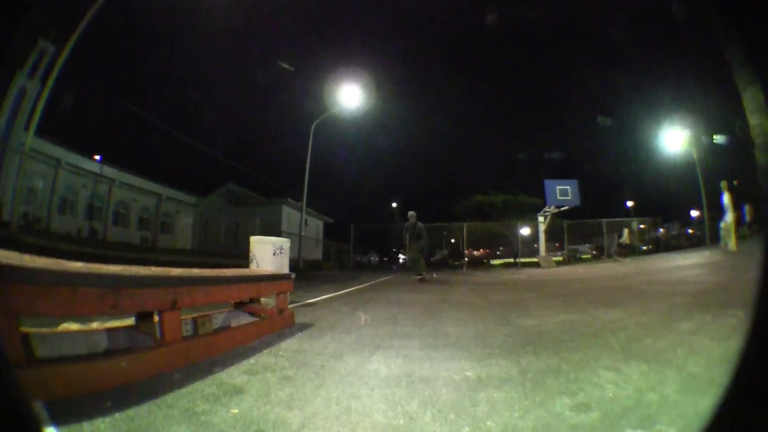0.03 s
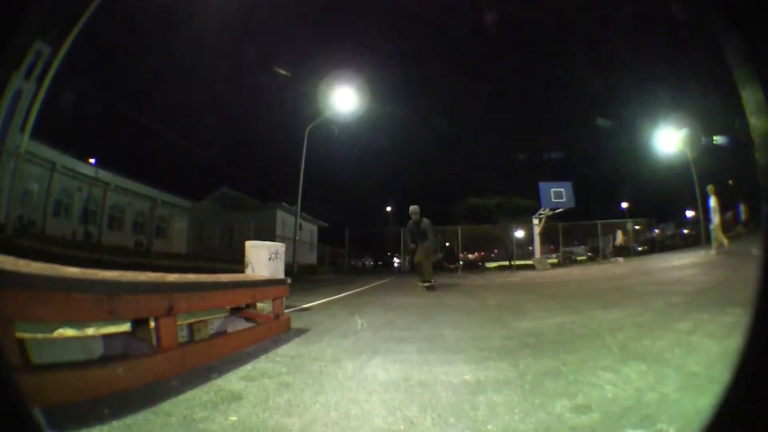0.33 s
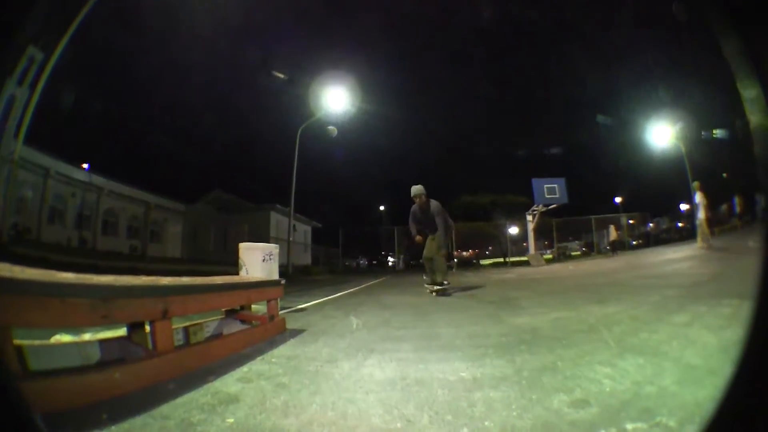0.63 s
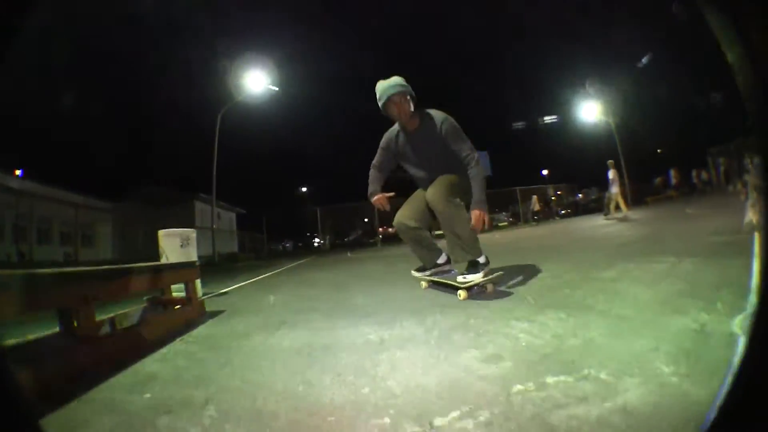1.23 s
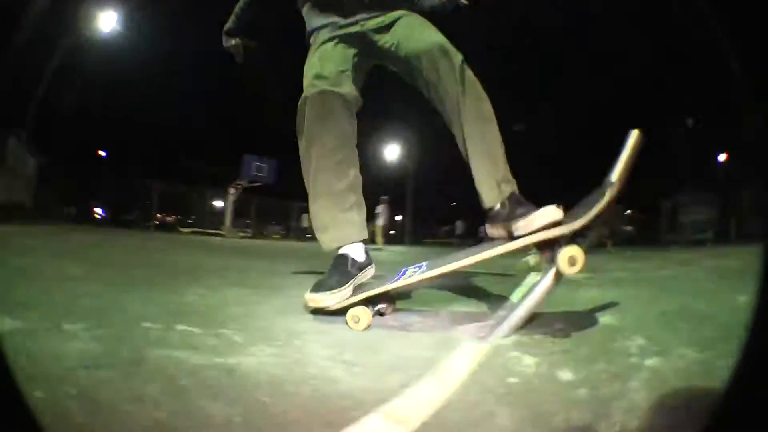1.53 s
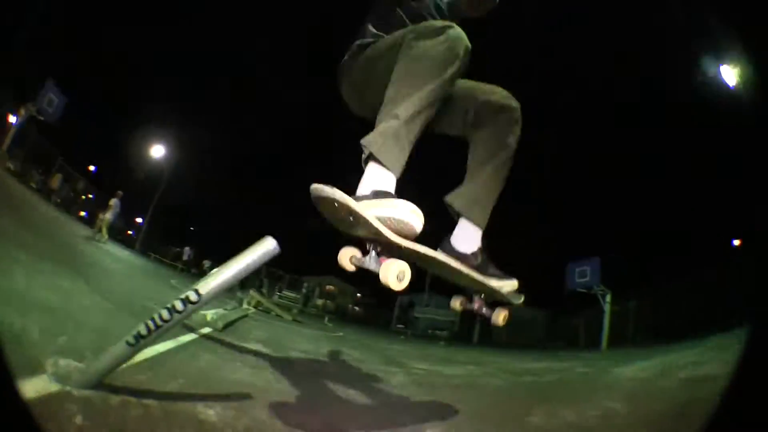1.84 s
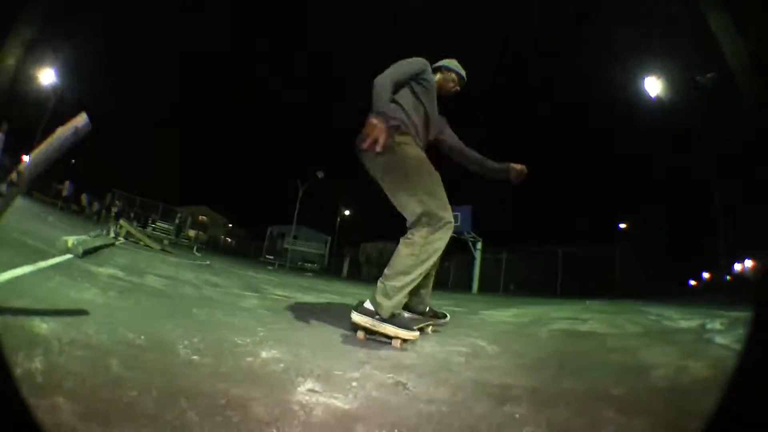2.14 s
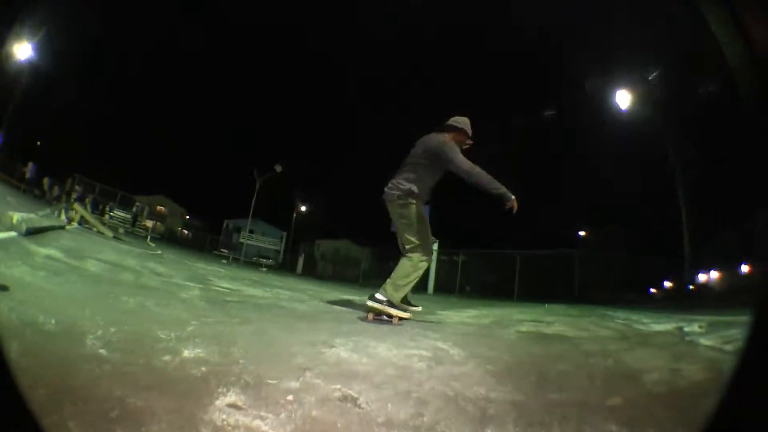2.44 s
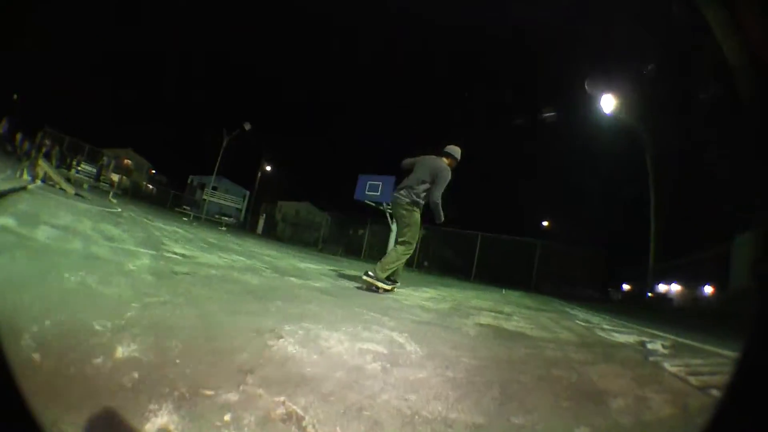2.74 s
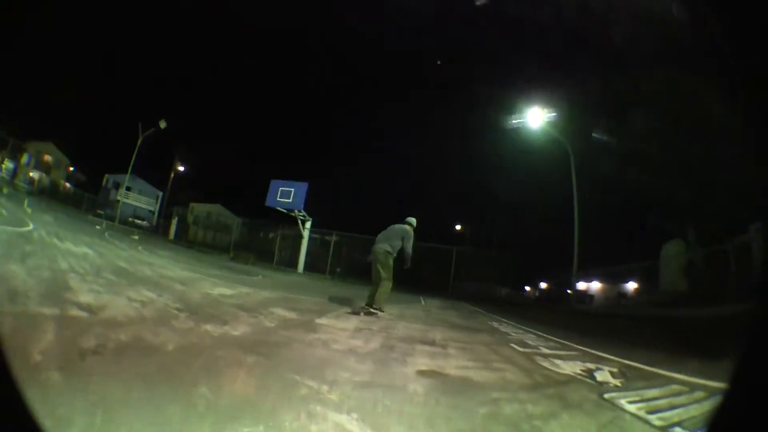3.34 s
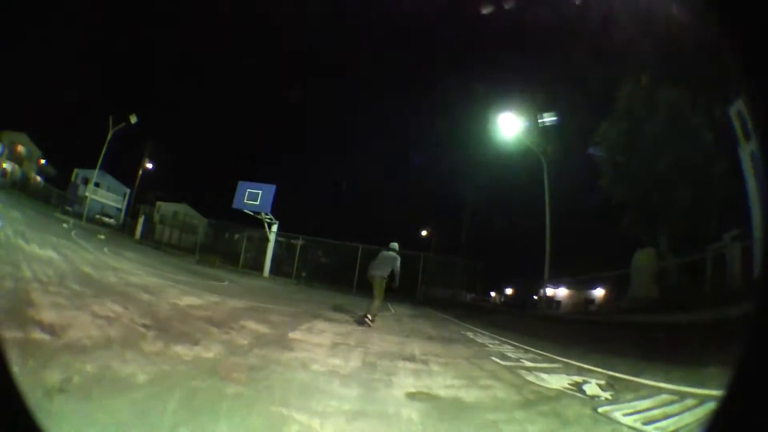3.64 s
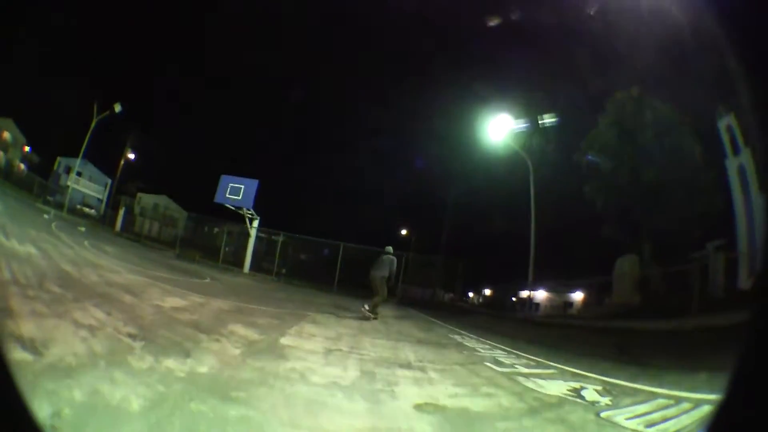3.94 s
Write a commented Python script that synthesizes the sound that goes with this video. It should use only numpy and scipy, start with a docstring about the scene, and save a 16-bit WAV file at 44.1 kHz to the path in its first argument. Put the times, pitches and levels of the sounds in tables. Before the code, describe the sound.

A skateboard rolls over a rough outdoor court with a gritty roar and small crunches of stones. At about 1.6 seconds it scrapes and clanks up a steel pole, then the rolling stops and a high metallic ring swells with a faint echo. It slams down at 2.1 seconds and rolls away more quietly until 4 seconds, the wheels knocking over cracks and giving short sideways skids.

```python
"""Skateboard pole jam

A skateboard rolls up over a rough outdoor court, grit drumming on the deck and stones crunching.
It jams up a slanted steel pole and pops off, one truck ringing and the court echoing as it flies.
It lands hard, then clatters away, its wheels knocking over cracks and slipping sideways."""
import sys
import numpy as np
from scipy import signal
from scipy.fft import rfft, irfft
from scipy.io import wavfile

SR = 44100
rng = np.random.default_rng(int(sys.argv[2]) if len(sys.argv) > 2 else 0)


def inscribe(sig):
    """Save sig as 16-bit PCM at rate SR to the path in sys.argv[1].

    A 1-D sig is mono; a 2-D sig holds one channel per row.
    Samples are clipped to [-1, 1] before scaling.
    """
    pcm = np.round(np.clip(np.atleast_2d(sig).T, -1, 1) * 32767)
    wavfile.write(sys.argv[1], SR, pcm.astype(np.int16))


N = 176400
T = np.arange(N) / SR
BIN_HZ = np.arange(N // 2 + 1) * SR / N


def from_db(db):
    """Decibels to gain."""
    return 10 ** (np.asarray(db) / 20)


def unit_rms(x):
    """Scale so that the middle of the stereo pair has rms 1."""
    return x / np.sqrt(np.mean(x.mean(0) ** 2) + 1e-20)


def pan(db):
    """Channel gains for a left-minus-right level."""
    return from_db(db * np.array([[0.5], [-0.5]]))


def gate(start_s, end_s):
    """On between two times: 1 ms fade in, 5 ms fade out."""
    return np.clip((T - start_s) * 1000, 0, 1) * np.clip((end_s - T) * 200, 0, 1)


def faders(rows):
    """One gain curve for each level column of (time_s, level_db, ...)."""
    times, *columns = np.transpose(rows)
    return [from_db(np.interp(T, times, column)) for column in columns]


def envelope(rows):
    """One gain curve, silent outside its rows."""
    return faders(rows)[0] * gate(rows[0][0], rows[-1][0])


def over_bins(points):
    """A (freq_hz, value) curve read at every FFT bin."""
    hz, value = np.transpose(points)
    return np.interp(np.log(BIN_HZ + 1), np.log(hz), value)


def body(x, colour):
    """A resonant body: a causal, minimum-phase filter with the given colour."""
    cepstrum = irfft(np.log(from_db(over_bins(colour))), N)
    cepstrum[1:N // 2] *= 2
    cepstrum[N // 2 + 1:] = 0
    return irfft(rfft(x) * np.exp(rfft(cepstrum)), N)


def drift(rate_hz):
    """A smooth random wobble with standard deviation 1."""
    wobble = irfft(rfft(rng.standard_normal(N)) / (1 + (BIN_HZ / rate_hz) ** 2), N)
    return wobble / wobble.std()


# How alike left and right are: freq_hz, likeness (clipped to +-0.99)
STEREO_LIKENESS = [(100,-0.4),(250,1.6),(500,0.66),(1000,0.83),(2000,0.66),(4000,0.75),(8000,0.43),(14000,0.25)]

def widen(mid, side):
    """Stereo from two unrelated signals: narrow in the mids, wide in the bass and treble."""
    alike = np.clip(over_bins(STEREO_LIKENESS), -0.99, 0.99)
    return irfft(np.sqrt(1 + alike) * rfft(mid) + np.sqrt(1 - alike) * rfft(side) * [[1], [-1]], N)


def grit(per_s, spread_db, hiss_db, rough_db, rough_hz):
    """Tiny uneven impacts over a smooth hiss, pressed harder and softer by bumps."""
    sizes = from_db(spread_db * np.minimum(rng.exponential(1, N), 4))
    impacts = sizes * (rng.random(N) < per_s / SR)
    clicks = impacts / impacts.std() * rng.choice([-1, 1], (2, N))
    bumps = from_db(rough_db * drift(rough_hz))
    hiss = from_db(hiss_db) * rng.standard_normal((2, N))
    return widen(*((clicks + hiss) * bumps))


def blows(rows, colour, side_db):
    """Each blow (start_s, level_db, t60_s) is a dense crack that dies fast in the struck body."""
    force = sum(from_db(db - 60 * np.maximum(T - s, 0) / t60) * (T >= s) for s, db, t60 in rows)
    mid, side = rng.choice([-1, 1], (2, N)) * force
    cracks = mid + from_db(side_db) * side * np.array([[1], [-1]])
    colour_rms = np.sqrt(np.mean(from_db(over_bins(colour)) ** 2))
    return body(cracks, colour) / colour_rms


def deck_ring(x, t60_s=0.14, damped_above_hz=2500):
    """The plywood's many close modes ring on briefly after every impact."""
    ring = rng.standard_normal(N) * from_db(-60 * np.minimum(T / t60_s, 4))
    ring *= from_db(-11) / np.sqrt(np.sum(ring ** 2))
    ring = signal.sosfilt(signal.butter(1, damped_above_hz, fs=SR, output="sos"), ring)
    return x + irfft(rfft(x) * rfft(ring), N)


# Where the roll sits in the image: freq_hz, left_minus_right_db
ROLL_PAN = [(60, -7), (150, 5.5), (380, 6.5), (950, 1.5), (2380, 0.5), (5980, -0.5), (15000, 0)]

def rolling(deck, rows, crossovers_hz):
    """The ringing deck, split into bands that each ride their own fader."""
    spectrum = rfft(deck_ring(deck)) * pan(over_bins(ROLL_PAN))
    lowpasses = [0] + [1 / (1 + (BIN_HZ / hz) ** 10) for hz in crossovers_hz] + [1]
    bands = [irfft(spectrum * (upper - lower), N) for lower, upper in zip(lowpasses, lowpasses[1:])]
    return sum(gain * unit_rms(band) for gain, band in zip(faders(rows), bands))


# The deck's tone far off, then close by: freq_hz, level_db
DECK_FAR_COLOUR = [(35,-56),(100,-44),(140,-23),(200,-23),(400,-10),(515,4.5),(640,-8.5),(760,-4.5),(890,-3.5),(1050,-6.5),(1320,-9),(1520,-9.5),(1950,-17),(2650,-13.5),(3900,-15.5),(5700,-22.5),(6400,-19),(7100,-27),(13000,-36.5),(15000,-66)]
DECK_CLOSE_COLOUR = [(35, -61), (87, -39), (151, -25), (324, -17), (418, -1), (605, -1), (916, -8.5),
                     (1010, -1.5), (1300, -14), (1490, -12), (1750, -18), (3340, -17.5), (6230, -22),
                     (7000, -26.5), (13500, -39.5), (15000, -82)]
# The swell of the approach: time_s, roar_db, treble_db
RUN_UP_LEVELS = [(0.09, -18, -31.5), (0.16, -15.5, -27.5), (0.228, -20.5, -31), (0.268, -16.5, -27),
                 (0.566, -17, -28), (0.584, -21, -32), (0.614, -15, -27), (0.854, -16, -25.5),
                 (0.867, -11.5, -21), (0.954, -17.5, -28), (1.15, -16.5, -26.5), (1.266, -14, -24),
                 (1.562, -13, -21.5), (1.642, -18.5, -32), (1.66, -19, -28)]
RUN_UP_S = (0.085, 1.674)

def run_up():
    """Grit under the wheels drums on the deck, whose tone shifts as it comes close."""
    contact = grit(per_s=2500, spread_db=2, hiss_db=-0.5, rough_db=1.5, rough_hz=52)
    far = unit_rms(body(contact, DECK_FAR_COLOUR))
    close = unit_rms(body(contact, DECK_CLOSE_COLOUR))
    nearness = np.interp(T, [0.89, 1.14], [0, 1])
    deck = (1 - nearness) * far + nearness * close
    return rolling(deck, RUN_UP_LEVELS, crossovers_hz=[2000]) * gate(*RUN_UP_S)


# Stones caught under a wheel: start_s, level_db
STONE_BURSTS = [(0.709,-21),(0.884,-15.5),(1.372,-20),(1.486,-14.5),(1.524,-15),(1.59,-13.5),(2.601,-19),(2.714,-22),(2.779,-19.5),(2.93,-23.5)]
# Their brittle tone: freq_hz, level_db
STONE_COLOUR = [(100,-50),(1200,2.5),(3800,3.5),(8000,-4.5),(14000,-39)]

def crunches(stone_t60_s=0.058, ticks_per_s=45, tick_t60_s=0.014):
    """Small stones burst under the wheels; stray grains tick along with the run-up's treble."""
    stones = blows([(s, db, stone_t60_s) for s, db in STONE_BURSTS], STONE_COLOUR, side_db=-7)
    pinches = (rng.random(N) < ticks_per_s / SR) * rng.uniform(0.36, 1, N)
    force = signal.lfilter([1], [1, -from_db(-60 / (tick_t60_s * SR))], pinches + 1e-18)
    grains = widen(*(force * rng.choice([-1, 1], (2, N))))
    ticks = unit_rms(body(grains, STONE_COLOUR))
    _, treble = faders(RUN_UP_LEVELS)
    return stones + from_db(-7) * ticks * treble * gate(*RUN_UP_S)


# The steel pole's modes: pitch_hz, level_db, t60_s
STEEL_MODES = [(1400,-19,0.15),(2728,-19.5,0.6),(3040,-18,0.062),(3530,-13.5,0.17),(3980,-16,.1),(4280,-5.5,0.056),(4620,-3,0.028),(5200,-6,0.052),(6050,-9.5,0.038),(7940,-25,0.09),(8250,-21,.07)]

def pole_ring(force):
    """Each mode of the pole is a damped resonator, driven a little unevenly by the force."""
    rings = 0
    for hz, db, t60 in STEEL_MODES:
        decay, step = from_db(-60 / (t60 * SR)), 2 * np.pi * hz / SR
        drive = force * from_db(db + 2 * drift(31)) + 1e-18
        rings += signal.lfilter([0, np.sin(step)], [1, -2 * decay * np.cos(step), decay ** 2], drive)
    return rings


# The scrape up the pole: time_s, level_db
GRIND_LEVELS = [(1.575,-32),(1.61,-13),(1.642,-15.5),(1.663,-26),(1.695,-20.5),(1.715,-25),(1.73,-22),(1.755,-28),(1.772,-34),(1.825,-34.5),(1.885,-41)]
# Its steel-on-steel tone: freq_hz, level_db
SCRAPE_COLOUR = [(60,-54),(300,-3.5),(800,-3.5),(1100,3),(3000,0),(4400,2.5),(6000,-1),(7000,-8),(7900,-6),(9500,-16),(15000,-28)]

def pole_grind(ring_db=-12):
    """The trucks slide along the pole; some of the friction sings in its modes."""
    rub = grit(per_s=960, spread_db=5.5, hiss_db=1.5, rough_db=0.5, rough_hz=74)
    scrape = unit_rms(body(rub, SCRAPE_COLOUR))
    ring = from_db(ring_db) * unit_rms(pole_ring(rub))
    return unit_rms(scrape + ring) * envelope(GRIND_LEVELS)


# Trucks hitting the pole: start_s, crack_db, crack_t60_s, ring_db
TRUCK_HITS = [(1.610,-13,0.025,-27),(1.64,-15,0.016,-31),(1.668,-7,0.02,-8),(1.6935,-19,.02,-27),(1.71,-25,.02,-33),(1.7345,-3.5,0.017,-20),(1.74,-7.5,0.032,-17),(1.7483,-8.5,0.037,-25),(1.7886,-20.5,0.043,-24),(1.8236,-25,.015,-37)]
# The tone of the crack: freq_hz, level_db
CLANK_COLOUR = [(59, -69), (317, -11.5), (680, -20), (820, -11), (1430, 0), (2230, -4), (3460, -2),
                (4450, 1.5), (5040, -11), (8170, -14.5), (15000, -34)]

def pole_clanks():
    """Each strike of a truck is a hard crack that sets the pole ringing."""
    cracks = blows([row[:3] for row in TRUCK_HITS], CLANK_COLOUR, side_db=-7.5)
    start_s, _, _, ring_db = np.transpose(TRUCK_HITS)
    kicks = np.zeros((2, N))
    kicks[:, (start_s * SR).astype(int)] = from_db(ring_db + rng.normal(0, 1, (len(start_s), 2)).T)
    return cracks + pole_ring(kicks)


def truck_tones(partials, pressed_sharp=0.014, release_s=(1.80, 1.84)):
    """Wavering partials, sharp while the truck presses on the pole, sagging as it comes free."""
    bend = 1 + np.interp(T, release_s, [pressed_sharp, 0])
    phase_per_hz = 2 * np.pi * np.cumsum(bend) / SR
    tones = 0
    for hz, db, pan_db in partials:
        gain = pan(pan_db) * from_db(db + 0.4 * drift(30))
        tones += gain * np.sin(hz * phase_per_hz + 0.05 * drift(20))
    return np.sqrt(2) * tones


# The truck's note and its overtone: free_pitch_hz, level_db, left_minus_right_db
TRUCK_NOTE = [(2800,-14,1),(2678,-2,9.5),(2650,-24,-4)]
TRUCK_OVERTONE = [(7570,-6,0),(7620,-1,0),(7690,-7,0)]
# The level of its ring: time_s, note_db, overtone_db
TRUCK_LEVELS = [(1.68,-43,-46),(1.76,-35,-43),(1.81,-37,-46),(1.832,-33,-38),(1.842,-28,-45),(1.90,-25,-49),(1.935,-20,-59),(1.985,-16,-60),(2.04,-20,-60),(2.09,-23,-62),(2.115,-50,-65)]

def singing_truck():
    """The struck truck rings on through the air until the board lands."""
    note, overtone = faders(TRUCK_LEVELS)
    ring = note * truck_tones(TRUCK_NOTE) + overtone * truck_tones(TRUCK_OVERTONE)
    return ring * gate(TRUCK_LEVELS[0][0], TRUCK_LEVELS[-1][0])


# The court's wash while the board flies: time_s, level_db
COURT_LEVELS = [(1.864,-39),(1.869,-26),(1.90,-33.5),(1.96,-23.5),(2.025,-20),(2.09,-23),(2.14,-22),(2.15,-55)]
# Its tone: freq_hz, level_db
COURT_COLOUR = [(59, -82), (100, -52), (262, -21.5), (1000, -16), (1320, -13), (2420, -20.5), (2630, -12),
                (2920, -19), (6220, -26), (15000, -44)]

def court_echo():
    """A diffuse wash of noise plays the echo from the walls around the court."""
    wash = grit(per_s=1200, spread_db=5, hiss_db=6, rough_db=1.8, rough_hz=21)
    return unit_rms(body(wash, COURT_COLOUR)) * envelope(COURT_LEVELS) * pan(db=3.5)


# Wheels and deck coming down: start_s, slam_db, slam_t60_s, snap_db
LANDING_HITS = [(2.0935,-0.5,0.014,-7),(2.0979,-11.5,0.055,-15),(2.112,-11,0.022,-20),(2.1167,-9,0.029,-7),(2.131,-13,0.0093,-20),(2.141,-15,0.014,-39)]
# The full slam and the bright snap: freq_hz, level_db
SLAM_COLOUR = [(59, -70), (330, -5), (962, -1), (1290, 5), (1460, 1.5), (2470, -0.5), (3530, 1),
               (4180, -12), (4940, -6), (7050, -25), (13000, -25), (15000, -44)]
HARDWARE_COLOUR = [(300,-42),(2600,-16),(3600,6),(5300,-1),(6000,-10),(13000,-21)]

def landing(snap_t60_s=0.013):
    """The board slams down in a quick cluster of blows, each with a snap of its hardware."""
    slams = blows([row[:3] for row in LANDING_HITS], SLAM_COLOUR, side_db=-9)
    snaps = blows([(s, db, snap_t60_s) for s, _, _, db in LANDING_HITS], HARDWARE_COLOUR, side_db=-15)
    return (slams + snaps) * pan(db=0.5)


# The deck's tone as it leaves: freq_hz, level_db
DECK_AWAY_COLOUR = [(35, -60), (120, -25.5), (263, -13), (355, -5.5), (680, -2), (1100, -2.5), (1300, -5),
                    (1710, -7), (1920, -10.5), (3580, -11.5), (5300, -18), (6230, -16), (6840, -20.5),
                    (13400, -32.5), (15000, -70)]
# The ride away: time_s, roar_db, clatter_db, treble_db
RUN_OUT_LEVELS = [(2.15, -43, -47, -43), (2.185, -50, -48, -48.5), (2.272, -27, -27.5, -35),
                  (2.304, -27.5, -19, -27), (2.325, -28.5, -32.5, -37), (2.37, -27.5, -18, -25),
                  (2.49, -27.5, -23.5, -29.5), (2.546, -27, -23.5, -31.5), (2.654, -21.5, -19, -26.5),
                  (2.7, -25, -23, -28), (3.02, -23.5, -22, -28.5), (3.256, -30.5, -25, -28),
                  (3.318, -29.5, -32, -32.5), (3.416, -28, -27.5, -29), (3.598, -25.5, -25, -28.5),
                  (3.638, -32, -24.5, -28), (3.798, -25.5, -25.5, -29), (3.99, -26, -28, -29.5)]

def run_out(touchdown_s=2.146):
    """Grit drums on the deck again; the level dips briefly after the landing, then the clattering rises."""
    contact = grit(per_s=2500, spread_db=2, hiss_db=-3, rough_db=1.6, rough_hz=180)
    roll = rolling(body(contact, DECK_AWAY_COLOUR), RUN_OUT_LEVELS, crossovers_hz=[650, 2000])
    return roll * gate(touchdown_s, np.inf) * pan(db=0.9)


# Wheels meeting cracks: start_s, level_db
CRACK_HITS = [(2.299,-11.5),(2.388,-6),(2.432,-4),(2.476,-3.5),(2.5072,-7),(2.558,-3),(2.644,-8),(2.658,-4),(2.665,-14),(3.471,-15),(3.86,-11.5)]
# Their hollow tone: freq_hz, level_db
CRACK_COLOUR = [(30,-52),(150,-31),(350,-7),(800,-15),(1200,-1.5),(1650,0.5),(2100,-18),(4000,-23),(14000,-48)]

def knocks(t60_s=0.014):
    """The wheels knock over cracks in the court."""
    return blows([(s, db, t60_s) for s, db in CRACK_HITS], CRACK_COLOUR, side_db=-15)


# Sideways slips of the wheels: peak_s, width_s, level_db, pitch_hz
SLIP_SURGES = [(2.383,.025,-23,1330),(2.448,0.031,-20,1470),(2.484,0.024,-18,1380),(2.526,0.03,-22.5,1590),(2.654,0.022,-17,1480),(2.838,0.027,-25.5,1830),(2.965,0.026,-29,1190),(3.122,0.026,-19,1830),(3.228,0.066,-24,1680)]
# Their tone before it is shifted to each pitch: freq_hz, level_db
JUDDER_COLOUR = [(30,-76),(150,-57),(400,-28),(900,-15),(1300,7),(1700,4.5),(2300,-14),(4000,-23),(14000,-43)]

def slips(colour_centre_hz=1500):
    """Urethane judders across the ground in surges as the rider steers out of the landing."""
    judder = deck_ring(grit(per_s=630, spread_db=3, hiss_db=-4, rough_db=1.5, rough_hz=140))
    surges = 0
    for peak_s, width_s, db, pitch_hz in SLIP_SURGES:
        colour = [(hz * pitch_hz / colour_centre_hz, level) for hz, level in JUDDER_COLOUR]
        swell = from_db(db) * np.exp(-2 * ((T - peak_s) / width_s) ** 2)
        surges += unit_rms(body(judder, colour)) * swell
    return surges * pan(db=2)


def scene():
    """The whole trick: approach, pole, flight, landing and ride away."""
    return (run_up() + crunches() + pole_grind() + pole_clanks() + singing_truck() + court_echo()
            + landing() + run_out() + knocks() + slips())


def record(dry, ceiling=0.95, stopband_hz=15600):
    """The microphone rounds the highest peaks; the top is cut."""
    rounded = dry / (1 + np.abs(dry / ceiling) ** 6) ** (1 / 6)
    return signal.sosfilt(signal.cheby2(14, 60, stopband_hz, fs=SR, output="sos"), rounded)


dry = scene()
out = record(dry)
inscribe(out)
```